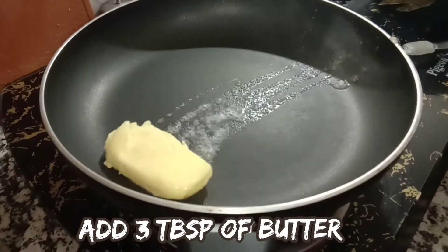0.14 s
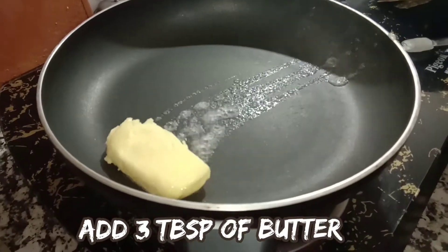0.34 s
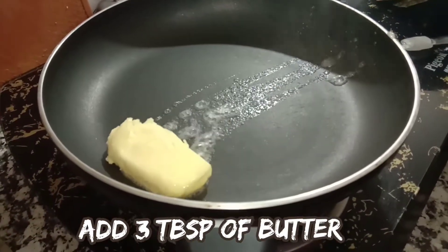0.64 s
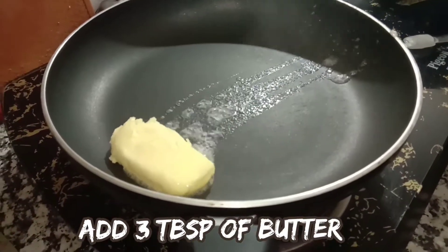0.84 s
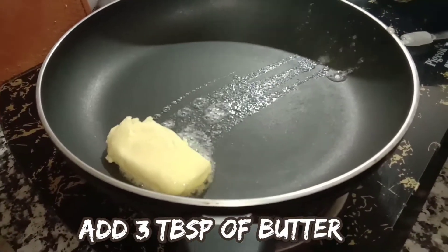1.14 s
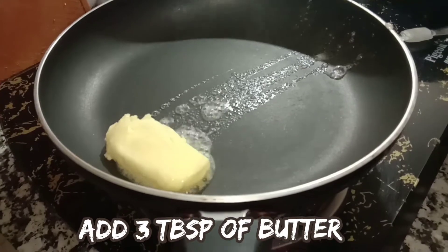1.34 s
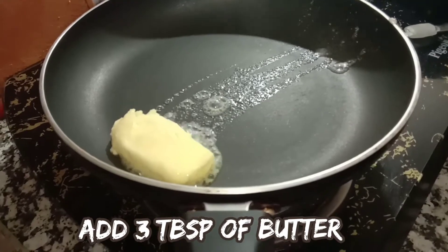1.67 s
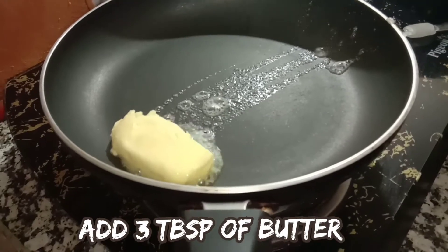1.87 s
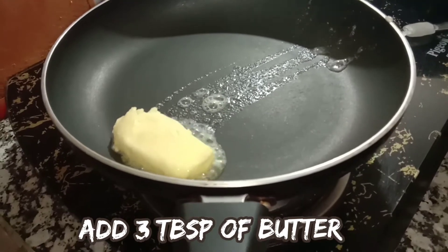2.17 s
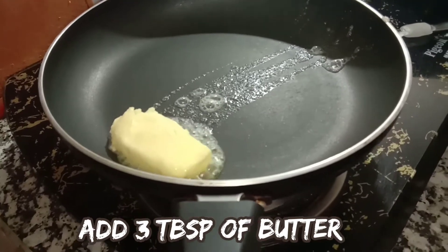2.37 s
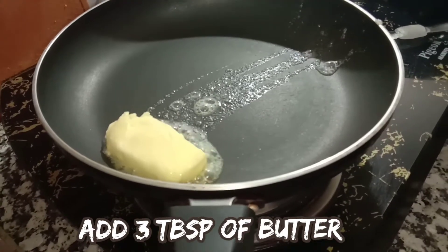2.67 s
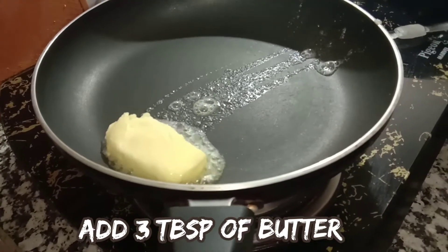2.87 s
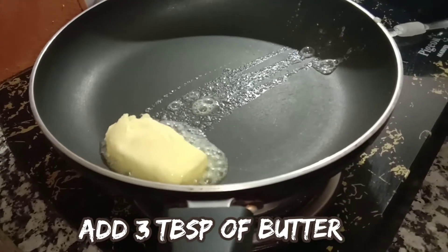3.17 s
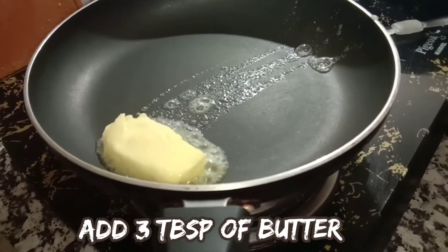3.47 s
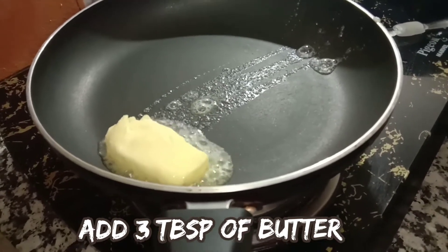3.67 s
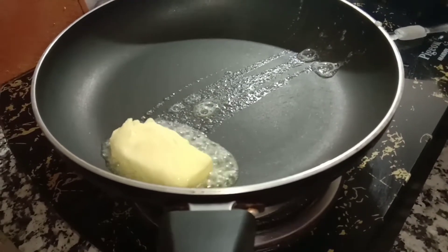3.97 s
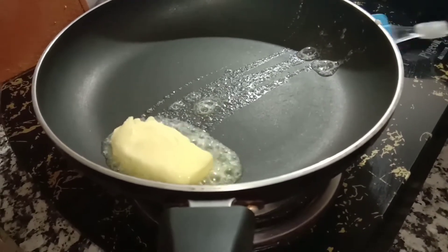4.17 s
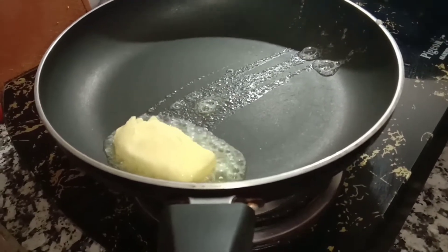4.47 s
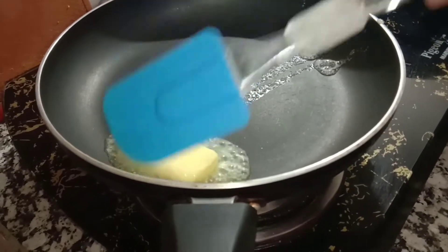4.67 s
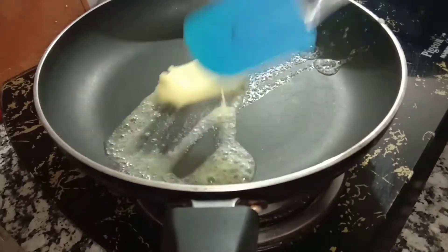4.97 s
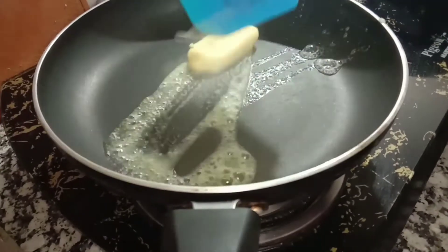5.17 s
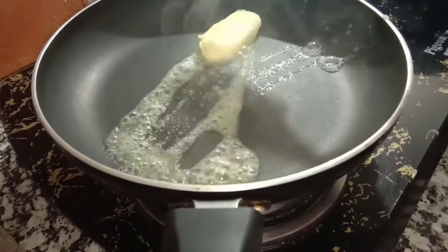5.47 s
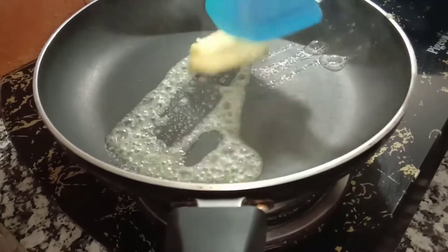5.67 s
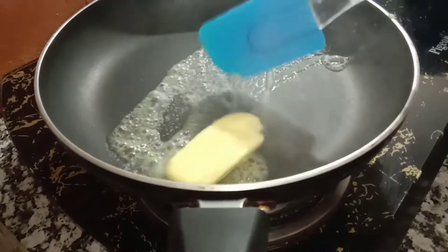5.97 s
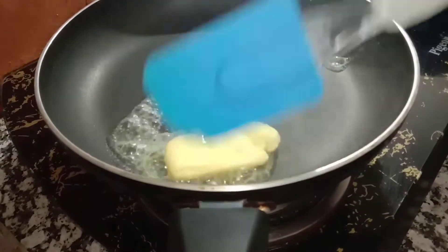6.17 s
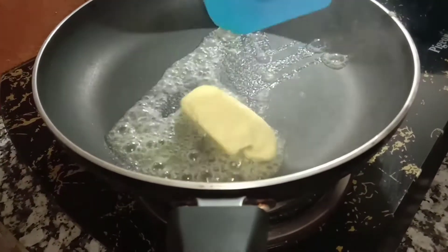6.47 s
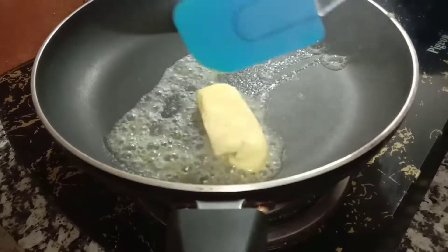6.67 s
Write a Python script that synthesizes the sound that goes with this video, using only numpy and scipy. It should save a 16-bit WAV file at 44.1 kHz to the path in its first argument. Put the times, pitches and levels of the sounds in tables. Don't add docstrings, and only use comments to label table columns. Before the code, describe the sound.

A continuous fine frying hiss with irregular snaps, fat bubble pops and a few light knocks nearby. The early part is thin and spitting, the middle slightly fuller and smoother. Near 4.8 seconds, faint rubbing on the pan is nearly buried as the foam flares, much louder, and keeps surging. A barely audible gas flame flutters low. Close mono microphone in a tiled kitchen with short reflections.

```python
import sys
import numpy as np
from scipy import signal
from scipy.fft import rfft, irfft
from scipy.io import wavfile

SR = 44100
rng = np.random.default_rng(int(sys.argv[2]) if len(sys.argv) > 2 else 0)


def to_wav(sig):
    pcm = np.clip(np.atleast_2d(sig), -1, 1) * 32767
    pcm = np.round(pcm).astype(np.int16)
    wavfile.write(sys.argv[1], SR, pcm.T)


def invert_db(x):
    u = np.asarray(x, float) / 20
    return 10 ** u


N = 301203

# frequency in Hz, density in dB per Hz.
HISS_SPECTRUM = [(2120, -52.5), (3600, -13.5), (4140, -19), (5810, -1.5), (6080, 2.5), (6640, -3),
                 (7200, 2.5), (8170, -8.5), (9820, -21), (10500, -22.5), (13600, -75.5), (22000, -120)]
# frequency in Hz, density in dB per Hz.
SPRAY_SPECTRUM = [(6000, 1), (9000, 2), (10100, -7.5), (12000, -4), (13700, -2), (14300, 2.5),
                  (14800, 14.5), (15500, 9.5), (16500, -20)]
# frequency in Hz, density in dB per Hz.
LARGE_SPECTRUM = [(300, -43), (500, -33), (800, -28), (1060, -38), (1500, -22), (1950, -15.5), (2200, -6),
                  (2600, -7), (3000, 1.5), (3500, -11), (4000, -4.5), (4600, -5.5), (6000, -4),
                  (10000, -50.5)]
# time in seconds, vigour in dB, smallness of the bubbles in dB per octave.
BOIL_CURVE = [(0, -30, 9), (.17, -29.5, 6.5), (.32, -29.5, 10), (.52, -28, 7), (.72, -31, 12),
              (1.05, -31, 6), (1.25, -32, 0.5), (1.9, -29, 2), (2.15, -27.5, 0.5), (3.05, -29, 1),
              (3.25, -27, -1), (4.35, -27.5, -4.5), (4.76, -29, -4.5), (4.88, -21.5, 0.5), (5.4, -22, -5),
              (6.0, -22, 3.5), (6.15, -23.5, -1.5), (6.83, -20.5, 0.5)]


def foam():
    # frequency in Hz, width in Hz, level in dB.
    pan_modes = [(600, 44, -27), (810, 16, -14.5), (1270, 51.6, -1), (1726, 16, -4.5), (1950, 16, -5),
                 (2143, 94, -3), (2200, 22, -9), (2492, 9.5, 2.5), (2720, 17, 6.5), (2874, 110, 0.5),
                 (3210, 62, 5), (3510, 10, -41), (3800, 13, -22)]
    hiss_db, large_db, spray_db, per_s, smallness_db = controls()
    per_s = np.maximum(per_s, 100)

    unrest = np.exp(-0.084 * (hiss_db - hiss_db.mean()))
    steam_db = 1.72 * unrest * surges(per_s=40.0, fade_s=0.0049)
    slow_steam_db = 0.8 * unrest * surges(per_s=45.0, fade_s=0.018)

    shared = bursts(per_s, spread_db=3.5, fizz=0.41)
    small = invert_db(hiss_db + steam_db + slow_steam_db) * shared
    fine_bursts = rms_one(0.81 * shared + bursts(per_s, spread_db=3.5, fizz=1.0))
    fine = invert_db(spray_db + 0.65 * steam_db + 0.55 * drift(26)) * fine_bursts
    large_bursts = rms_one(0.41 * shared + bursts(0.3 * per_s, spread_db=2.0, fizz=0.89))
    large = invert_db(large_db + 0.12 * steam_db + 1.6 * drift(33)) * large_bursts

    rings = np.zeros(N)
    for k, (hz, width_hz, db) in enumerate(pan_modes):
        rings += (-1) ** k * invert_db(db) * resonance(large, hz, width_hz)

    small_rms, fine_rms, large_rms = [np.std(x) for x in (small, fine, large)]
    small = bubbles(small, 4440, 9420, cycles=4.8, count=7, smallness_db=smallness_db)
    fine = bubbles(fine, 9300, 10040, cycles=2.03, count=6)
    large = bubbles(large, 846, 5220, cycles=3.24, count=4)
    small = rms_one(colour(small, HISS_SPECTRUM))
    fine = rms_one(colour(fine, SPRAY_SPECTRUM))
    large = rms_one(colour(large, LARGE_SPECTRUM)) + invert_db(8.0) * rings / large_rms
    return invert_db(-2.5) * small_rms * small + fine_rms * fine + invert_db(-2.5) * large_rms * large


def controls():
    # time in seconds, spray gain in dB, large-bubble gain in dB, length in seconds.
    flares = [
        (0.696, 2.5, 3.5, 0.19),
        (3.4, -1, -1.5, .3),
        (3.953, 3.5, 1, 0.051),
        (4.796, -5, 7.5, 0.052),
        (5.0, 4.5, 0.8, 0.095),
        (5.664, -0.3, 4, 0.11),
        (5.88, 4, -2, 0.21),
        (6.156, 1.4, 4.5, 0.29),
        (6.58, 0.7, 2, 0.2),
    ]
    # start in seconds, hiss gain in dB, spray gain in dB, fade in seconds.
    pockets = [(.068, -3, 0, 0.015), (.255, 5, -1, 0.016), (.36, 4, -1, 0.022), (.449, 1, -6, .03),
               (.515, 0, -2, 0.01), (.593, -3, -1, 0.023), (1.008, 1.5, 1.2, 0.017), (1.145, 4, 1.5, 0.031),
               (1.239, 6, 0, 0.005), (1.288, -2, 9, 0.019), (1.43, 5, 4, 0.088), (1.59, 1.5, 8, 0.062),
               (2.066, 7, 12, 0.017), (2.106, 2.5, 3, .025), (2.285, 4.5, 7, 0.017), (2.828, 3, 6, 0.057),
               (2.96, 6.5, -3, 0.011), (3.21, 1, 1.2, .04), (3.47, -3, -1, .02), (3.672, 4, 1.2, 0.013),
               (3.86, 2.5, -3, 0.16), (4.19, -1, 0, .02), (4.35, 5.5, 1.2, 0.01), (5.07, 0, 4, 0.02),
               (5.245, 0.5, 3, 0.04), (5.85, 0, 1, 0.04), (6.01, 2.5, -1, 0.023)]
    vigour_db, smallness_db = in_time(BOIL_CURVE)
    flare_s, flare_spray_db, flare_large_db, flare_length_s = np.transpose(flares)
    pocket_s, pocket_hiss_db, pocket_spray_db, pocket_fade_s = np.transpose(pockets)
    swing_db = vigour_db - vigour_db.mean()

    hiss_db = vigour_db - 0.3 * smallness_db + outbreaks(pocket_s, pocket_hiss_db, pocket_fade_s)

    large_db = -46.5 + 1.05 * swing_db + 0.4 * drift(4)
    large_db += swells(flare_s, flare_large_db, flare_length_s)

    smear_db = 4 * np.exp(-(np.arange(N) / SR / 0.79) ** 2)
    spray_db = -43.5 + 0.99 * swing_db + smear_db + 0.4 * drift(4)
    spray_db += swells(flare_s, flare_spray_db, flare_length_s)
    spray_db += outbreaks(pocket_s, pocket_spray_db, pocket_fade_s)

    bursts_per_s = 3500 * invert_db(2.0 * drift(4.0))
    return hiss_db, large_db, spray_db, bursts_per_s, smallness_db + 3.3 * drift(6.8)


def bursts(per_s, spread_db, fizz):
    sizes = invert_db(spread_db * np.minimum(rng.exponential(1, N), 3.2)) * rng.choice([-1, 1], N)
    clicks = rms_one(sizes) * (rng.random(N) < per_s / SR) * np.sqrt(SR / per_s)
    return rms_one(clicks + fizz * rng.standard_normal(N))


def surges(per_s, fade_s):
    starts = rng.exponential(1, N) * (rng.random(N) < per_s / SR)
    fading = signal.lfilter([1], [1, -np.exp(-1 / (fade_s * SR))], starts)
    return 2.64 * np.tanh(rms_one(fading - fading.mean()) / 4.0)


def bubbles(clicks, low_hz, high_hz, cycles, count, smallness_db=0):
    dealt = rng.integers(0, count, N)
    pitches_hz = np.geomspace(low_hz, high_hz, count)
    total = np.zeros(N)
    for k, hz in enumerate(pitches_hz):
        share = invert_db(smallness_db * np.log2(hz / pitches_hz[2])) / np.sqrt(hz)
        total += kitchen(resonance(share * clicks * (dealt == k), hz, hz / cycles))
    return rms_one(total)


def spits():
    # start in seconds, peak level in dB.
    loudest = [(0.0209, -15), (0.121, -14), (0.2753, -14), (0.3204, -15), (0.4142, -15), (0.4519, -11),
               (0.4697, -14), (0.5217, -12), (0.5959, -14), (0.6023, -13), (0.9291, -15), (1.0403, -15),
               (1.1576, -13), (1.1813, -13), (1.1984, -13), (1.2407, -10), (1.2901, -13), (1.3667, -11),
               (1.7345, -12), (1.8134, -14), (2.0684, -11), (2.1069, -14), (3.0496, -12), (3.2234, -11),
               (3.4726, -9), (3.8644, -10), (4.1914, -9), (5.1779, -8), (5.7618, -8), (6.3244, -8)]
    start_s, peak_db = np.transpose(loudest)

    lesser_per_s = 55 * np.exp(-np.arange(N) / SR / 3.0)
    lesser = rng.random(N) < lesser_per_s / SR
    lesser_db = in_time(BOIL_CURVE)[0] + 8.5 + 4.5 + 1.2 * rng.standard_normal(N)
    clicks = lesser * invert_db(lesser_db) * rng.choice([-1, 1], N)
    clicks[np.round(start_s * SR).astype(int)] = invert_db(peak_db + 4) * rng.choice([-1, 1], len(start_s))

    spatter_fade_s = 0.0016
    spatter = signal.lfilter([1], [1, -np.exp(-1 / (spatter_fade_s * SR))], np.abs(clicks))
    spatter = spatter * rng.standard_normal(N)
    spit = clicks + 0.16 * spatter + 0.5 * kitchen(clicks)
    bright = colour(resonance(spit, 7000.0, 3300.0), HISS_SPECTRUM)
    return bright + 0.025 * colour(spit, SPRAY_SPECTRUM) + 0.062 * colour(spit, LARGE_SPECTRUM)


def pops():
    # start in seconds, peak level in dB, pitch in Hz.
    fat_bubbles = [
        (.128, -32, 4330),
        (0.47, -28, 4470),
        (0.596, -23.5, 8100),
        (1.853, -32.5, 4470),
        (3.133, -27, 4960),
        (4.075, -27, 4800),
        (5.486, -24.5, 4530),
        (5.655, -26, 4130),
    ]
    fade_s, ring_cycles = 0.017, 7.9
    out, t = np.zeros(N), np.arange(SR // 10) / SR
    for start_s, peak_db, hz in fat_bubbles:
        rattle = rng.standard_normal(len(t)) * invert_db(5.5 * rng.standard_normal(len(t)))
        ring = rms_one(resonance(rattle, hz, hz / ring_cycles))
        at = round(start_s * SR)
        out[at:at + len(t)] += invert_db(peak_db - 8.5) * ring * np.exp(-t / fade_s)
    return out


def rubs():
    # centre in seconds, level in dB, pan mode in Hz, length in seconds.
    strokes = [
        (4.81, -67, 730, 0.042),
        (4.85, -63, 714, 0.02),
        (4.93, -65, 727, .015),
        (4.953, -53.5, 1284, 0.049),
        (5.04, -60, 860, 0.023),
        (5.092, -66, 800, 0.017),
        (5.626, -66, 305, 0.048),
    ]
    out, t = np.zeros(N), np.arange(-SR // 8, SR // 8) / SR
    for centre_s, db, hz, length_s in strokes:
        grip = resonance(resonance(rng.standard_normal(len(t)), hz, 90.0), hz, 30.0)
        at = round((centre_s + t[0]) * SR)
        out[at:at + len(t)] += invert_db(db) * rms_one(grip) * np.exp(-(t / length_s) ** 2)
    return out


def clatter():
    # start in seconds, peak level in dB, high mode in Hz, low mode in Hz, low over high in dB.
    knocks = [(0.077, -43.5, 1270, 700, -10), (0.275, -50.5, 2930, 842, 0), (0.337, -38, 2770, 910, -10),
              (0.478, -42, 2710, 872, -19), (0.747, -33.5, 2540, 920, -12), (0.883, -44.5, 1310, 458, -13),
              (1.438, -40.5, 1350, 890, -3), (1.469, -39, 2760, 600, -7), (1.666, -38, 1490, 910, -9),
              (1.674, -38, 1760, 580, -6), (1.696, -49.5, 1270, 589, 0), (2.07, -29.5, 2400, 567, -20),
              (2.107, -35.5, 2630, 840, -11), (2.123, -35.5, 1630, 729, -25), (2.251, -32, 2350, 600, -35),
              (2.262, -30, 1950, 600, -12), (2.282, -30.5, 1980, 600, -10.5),
              (2.317, -36.5, 2690, 830, -7.5), (2.374, -48, 2400, 840, -10), (3.966, -46.5, 1140, 640, -3),
              (3.995, -47.5, 1090, 600, -3)]
    attack_s, fade_s = 0.0027, 0.022
    out, t = np.zeros(N), np.arange(SR // 5) / SR
    envelope = (1 - np.exp(-t / attack_s)) * np.exp(-t / fade_s)
    for start_s, peak_db, high_hz, low_hz, low_db in knocks:
        rattle = rng.standard_normal(len(t)) * invert_db(6.5 * rng.standard_normal(len(t)))
        high = resonance(resonance(rattle, high_hz, 1.5 * high_hz), high_hz, 0.23 * high_hz)
        low = resonance(resonance(rattle, low_hz, 2.0 * low_hz), low_hz, 0.25 * low_hz)
        broad = resonance(resonance(rattle, 1400, 1550.0), 1400, 1550.0)
        body = rms_one(high) + invert_db(low_db) * rms_one(low) + 0.6 * rms_one(broad)
        at = round(start_s * SR)
        out[at:at + len(t)] += invert_db(peak_db - 8.5) * body * envelope
    return kitchen(out)


def flame():
    # frequency in Hz, density in dB per Hz.
    roar_spectrum = [(8.8, -36), (15, -19), (27, 13), (43, -45), (74, 2), (92, 4), (109, 4), (135, -21),
                     (180, -6), (300, -120)]
    overtone_spectrum = [(74, -29), (125, 6), (140, -10.5), (210, 1), (263, -5.5), (291, -6.5), (340, -9.5),
                         (440, -15), (750, -120)]
    # centre in seconds, peak level in dB, length in seconds.
    puffs = [(.07, -71, .05), (0.71, -67, 0.073), (.9, -59, 0.032), (1.08, -71, 0.025), (1.5, -85, 0.037),
             (1.756, -74, .13), (2.19, -69, .08), (3.02, -64, 0.021), (3.267, -60, 0.063),
             (3.52, -61, 0.094), (3.9, -67, 0.084), (4.13, -65, 0.05), (4.3, -60, .07), (4.5, -65, 0.07),
             (4.615, -84, 0.038), (4.98, -66.5, 0.08), (5.204, -54, 0.034), (5.35, -75, 0.11),
             (5.623, -62, 0.062), (5.897, -58.5, 0.034), (6.04, -58, 0.025), (6.314, -56, 0.037),
             (6.497, -59.5, 0.026), (6.68, -70, .07)]
    # centre in seconds, peak level in dB, length in seconds.
    licks = [
        (1.484, -66, 0.044),
        (1.68, -68, 0.033),
        (2.112, -69, 0.04),
        (2.35, -82, 0.046),
        (3.398, -74, 0.11),
        (3.74, -71, .04),
        (4.08, -75, .04),
        (6.18, -70, 0.044),
        (6.6, -69, .07),
    ]
    centre_s, peak_db, length_s = np.transpose(puffs)
    puffing = invert_db(-74 + 1.0 * drift(12.0)) + swells(centre_s, invert_db(peak_db), length_s)
    centre_s, peak_db, length_s = np.transpose(licks)
    licking = invert_db(-73.5 + 2 * drift(2.5)) + swells(centre_s, invert_db(peak_db), length_s)

    flutter = puffing * colour(rng.standard_normal(N), roar_spectrum)
    flutter += licking * colour(rng.standard_normal(N), overtone_spectrum)
    return signal.sosfilt(signal.butter(3, 58.0, "high", fs=SR, output="sos"), flutter)


def still_air():
    # frequency in Hz, density in dB per Hz.
    air_spectrum = [(180, -37), (300, -2), (515, -1), (680, -4), (790, -9), (1060, -37), (1200, -41),
                    (1560, -41), (2640, -120)]
    low_pass = signal.butter(2, 60.0, fs=SR, output="sos")
    rumble = rms_one(signal.sosfilt(low_pass, rng.standard_normal(N)))
    return invert_db(-81.5) * rumble + invert_db(-78.5) * colour(rng.standard_normal(N), air_spectrum)


def kitchen(x):
    t60_s, wet_db = 0.1, -2
    t = np.arange(SR // 8) / SR
    tail = rng.standard_normal(len(t)) * invert_db(-60 * t / t60_s) * (t > 0.002)
    wet = signal.oaconvolve(x, tail / np.sqrt(np.sum(tail ** 2)))[:N]
    return (x + invert_db(wet_db) * wet) / np.sqrt(1 + invert_db(2 * wet_db))


def resonance(x, hz, width_hz):
    r = np.exp(-np.pi * width_hz / SR)
    poles = [1, -2 * r * np.cos(2 * np.pi * hz / SR), r * r]
    return signal.lfilter([(1 - r * r) / 2, 0, (r * r - 1) / 2], poles, x)


def colour(x, spectrum):
    hz, db = np.transpose(spectrum)
    grid_hz = np.linspace(1, SR / 2, 8193)
    grid_db = np.interp(np.log(grid_hz), np.log(hz), np.maximum(db, -70))
    cepstrum = irfft(np.log(invert_db(grid_db)))
    cepstrum[1:8192] *= 2
    cepstrum[8193:] = 0
    response = irfft(np.exp(rfft(cepstrum)))
    return signal.fftconvolve(x, response / np.sqrt(np.sum(response ** 2)))[:N]


def drift(rate_hz):
    r = np.exp(-2 * np.pi * rate_hz / SR)
    slow = signal.lfilter([1], [1, -2 * r, r * r], rng.standard_normal(N + SR))
    return rms_one(slow[SR:])


def swells(centre_s, height, length_s):
    t = np.arange(0, N + 64, 64) / SR
    bumps = np.exp(-((t - centre_s[:, None]) / np.maximum(length_s, 0.01)[:, None]) ** 2)
    return np.interp(np.arange(N) / SR, t, height @ bumps)


def outbreaks(start_s, height, fade_s):
    t = np.arange(0, N + 32, 32) / SR
    since_s = t - start_s[:, None]
    steps = (since_s >= 0) * np.exp(-np.abs(since_s) / np.maximum(fade_s, 0.005)[:, None])
    return np.interp(np.arange(N) / SR, t, height @ steps)


def in_time(rows):
    time_s, *columns = np.transpose(rows)
    return [np.interp(np.arange(N) / SR, time_s, column) for column in columns]


def rms_one(x):
    return x / np.sqrt(np.mean(x ** 2) + 1e-20)


def scene():
    mono = foam() + spits() + pops() + rubs() + clatter() + flame() + still_air()
    return np.array([mono, mono])


def band_limit(x):
    return signal.sosfilt(signal.butter(12, 16880, fs=SR, output="sos"), x)


def record(dry):
    rounded = 0.65 * np.tanh(invert_db(2.5) * dry / 0.65)
    low_pass = signal.ellip(14, 0.1, 90, 15500, fs=SR, output="sos")
    return band_limit(signal.sosfilt(low_pass, rounded))


dry = scene()
out = record(dry)
to_wav(out)
```